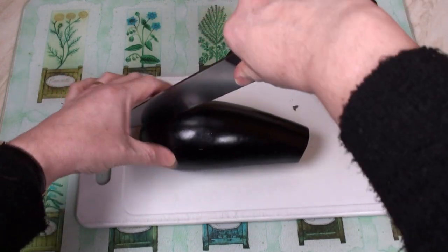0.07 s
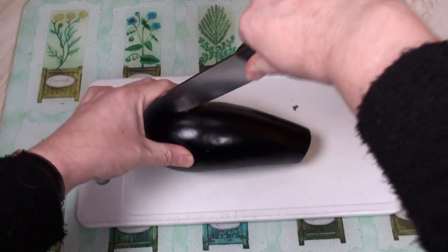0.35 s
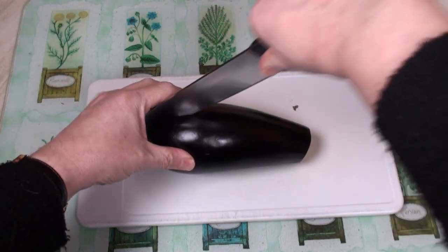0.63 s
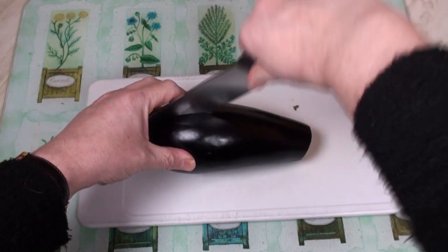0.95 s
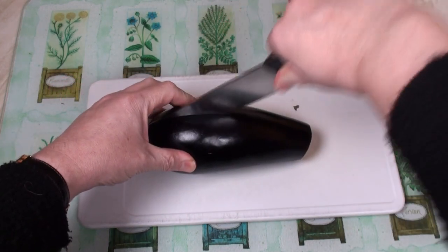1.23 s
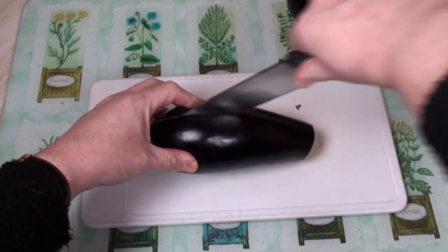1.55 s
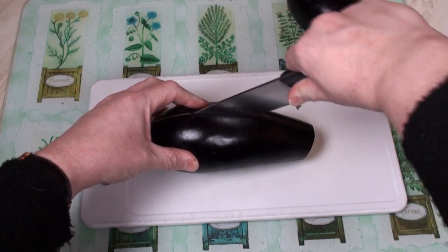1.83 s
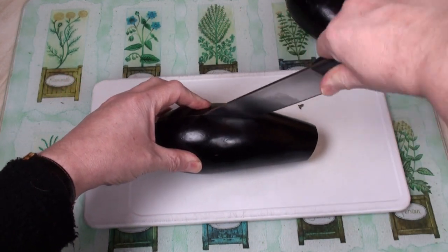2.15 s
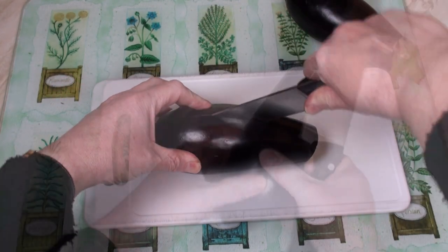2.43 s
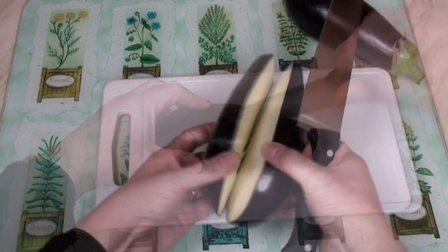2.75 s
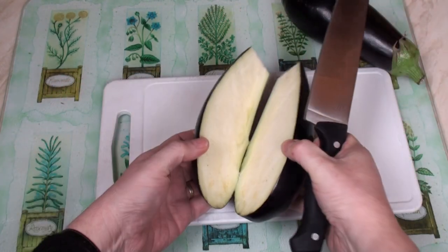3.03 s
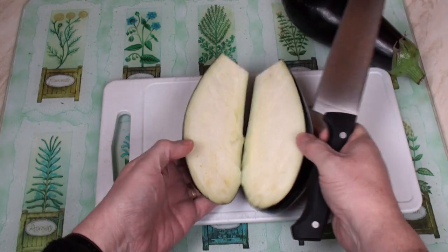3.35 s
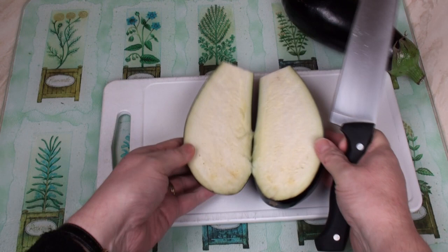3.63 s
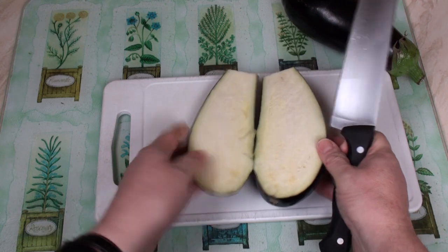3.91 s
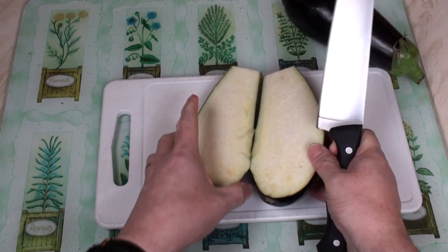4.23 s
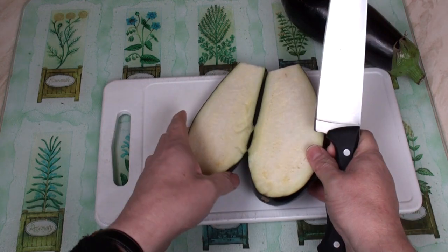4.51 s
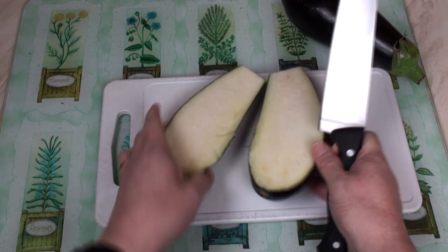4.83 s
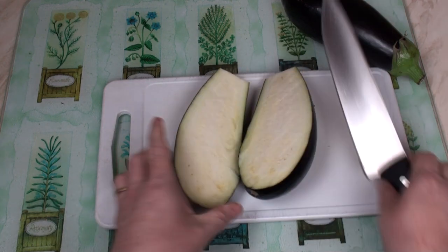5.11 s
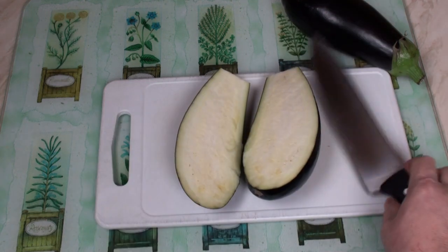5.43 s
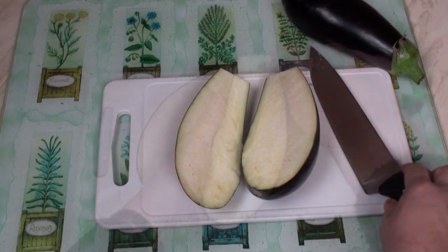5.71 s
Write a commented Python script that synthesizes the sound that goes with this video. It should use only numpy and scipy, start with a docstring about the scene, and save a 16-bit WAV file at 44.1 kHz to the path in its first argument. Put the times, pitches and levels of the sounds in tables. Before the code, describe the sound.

A kitchen knife cuts a raw aubergine with a few quiet, rasping strokes, close to the microphone, after a brief small rattle. The blade hits the plastic board with two loud, hollow knocks. Light rubs, moist taps and dull bumps follow as the halves are parted and set down, then the knife lands with a short ringing chatter. A faint hum and rumble fill the small, slightly echoing kitchen.

```python
"""In a small, live kitchen, hands shift an aubergine on a plastic chopping board and a small part rattles.
A chef's knife saws through it in six strokes, bursting cells and tearing skin; twice along the way
the edge strikes the board, and a hollow ring lingers. The halves are pulled apart and set down with
soft, damped bumps. Last, the knife is laid on the board and its steel rings and chatters.
Rumble and hum lie under it all, and the sound is nearly mono."""
import sys
import numpy as np
from scipy import signal
from scipy.fft import rfft, irfft, next_fast_len
from scipy.io import wavfile

SR = 44100
rng = np.random.default_rng(int(sys.argv[2]) if len(sys.argv) > 2 else 0)


def pcm_store(signal):
    """Save signal as 16-bit PCM."""
    levels = np.round(np.clip(np.atleast_2d(signal), -1, 1) * 32767)
    wavfile.write(sys.argv[1], SR, levels.astype(np.int16).T)


N = 258687
T = np.arange(N) / SR

# strokes of the blade: start_s, rise_s, hold_s, fall_s, level_db, skin_db
BLADE_STROKES = [(.695, .085, 0.11, 0.029, -43, -12), (1.261, 0.073, 0.04, 0.021, -36.5, -12.5),
                 (1.768, 0.096, 0.015, 0.019, -34.5, -12.5), (1.97, 0.043, .02, 0.026, -46.5, -9),
                 (2.279, 0.084, 0.011, .012, -38.5, -10), (2.827, 0.048, 0.015, 0.047, -43.5, -12)]
# spectrum of cells bursting, heard through flesh and board: frequency_hz, level_db
FLESH_SPECTRUM = [(71, -21), (120, -9), (243, -9.5), (413, 0), (648, -7.5), (788, 0.5), (1100, -3.5),
                  (1240, -5), (1360, -6.5), (3110, -23.5), (3560, -24.5), (3860, -26), (5820, -26.5),
                  (7080, -34), (13000, -39)]
def slicing():
    """Fracture noise grows as a power of blade speed: flesh yields at once, skin only tears at speed."""
    blade_hz, blade_width_hz = 3530, 130
    flesh_power, skin_power = 0.56, 2.03
    tearing = colour(crackle(per_s=7000, spread_db=2), FLESH_SPECTRUM)
    flesh = unit(cut(tearing, 2240, "low", order=4))
    blade_resonance = signal.iirpeak(blade_hz, blade_hz / blade_width_hz, fs=SR)
    blade = signal.lfilter(*blade_resonance, tearing)
    rasp = cut(tearing + undb(4) * blade, 2620, "high", order=4)
    skin = unit(cut(rasp, 11000, "low"))
    out = np.zeros(N)
    for start_s, rise_s, hold_s, fall_s, level_db, skin_db in BLADE_STROKES:
        speed = swell(start_s, rise_s, hold_s, fall_s)
        yielding = undb(-2.5) * flesh * speed ** flesh_power
        ripping = undb(skin_db) * skin * speed ** skin_power
        out += undb(level_db) * (yielding + ripping)
    return out


# the edge meets the board, tip then heel: start_s, level_db, contact_hz, crunch_db, worktop_db
EDGE_IMPACTS = [(1.8720, -8, 1850, -15, 4), (1.8741, -13.5, 2400, -8, -19), (1.8793, -23, 1655, -30, -14),
                (2.3666, -8.5, 1370, -11.5, 1.5)]
# modes of the plastic board: pitch_hz, level_db, t60_s
BOARD_MODES = [(391, -23, 0.12), (468.3, -24.5, 0.62), (591, -15.5, 0.4), (603, -0.5, 0.015),
               (724.5, -11.5, 0.15), (765, -6.5, 0.051), (959, -0.5, 0.026), (1440, -17.5, 0.07),
               (1990, -5, 0.009)]
# modes of the worktop under it: pitch_hz, level_db, t60_s
WORKTOP_MODES = [(28.4, -29, 0.16), (46.4, -24.5, .14), (104, -31, 0.28), (175, -27.5, 0.17),
                 (232, -21.5, 0.058), (374, -28.5, 0.11)]
def chops():
    """Impact excitation: the edge crunches through the last skin and rings both board and worktop."""
    out = np.zeros(N)
    for start_s, level_db, contact_hz, crunch_db, worktop_db in EDGE_IMPACTS:
        board = ring(BOARD_MODES) * fade(t60_s=0.3)  # the pressing edge adds damping
        knock = cut(board, contact_hz, "low") + undb(worktop_db) * ring(WORKTOP_MODES)
        crunch = cut(crack(crunch_db, t60_s=0.1), 2500, "low", order=1)
        crunch = cut(cut(crunch, 1400, "high"), 3270, "low")
        add(out, start_s, undb(level_db) * (knock + crunch))
    return out


def linger():
    """Exponential decay of band-limited noise: a soft hollow ring outlasts the last chop."""
    band_hz, level_db, t60_s = [555, 1005], -45, 1.37
    band = signal.butter(2, band_hz, "band", fs=SR, output="sos")
    hollow = unit(signal.sosfilt(band, rng.standard_normal(N)))
    out = np.zeros(N)
    add(out, EDGE_IMPACTS[-1][0], undb(level_db) * hollow * fade(t60_s, T))
    return out


# the knife lands, handle then blade, and settles: start_s, level_db, contact_hz, board_db
KNIFE_LANDINGS = [(5.7278, -10.5, 3560, -10), (5.7632, -13, 10900, -9), (5.807, -21.5, 3000, -7.5),
                  (5.852, -27, 5800, -13)]
# modes of the steel knife: pitch_hz, level_db, t60_s
STEEL_MODES = [(442, -16, .26), (555, -19, .16), (743, -4, .2), (1063, -15, .08), (1366, -9, .07),
               (1760, -12, .06), (2488, -7, .16), (2570, -7, .06), (2679, -12, .14), (2864, -13, .13),
               (3130, -14, .06), (3351, -10, .11), (3412, -10, .12), (3550, -11, .07), (3710, -7, .11),
               (4945, -18, .13), (5640, -15, .06), (6190, -16, .14), (6392, -18, .12), (6850, -14, .09),
               (7110, -18, .11), (7598, -14, .13), (8315, -17, .1), (8858, -17, .11), (10060, -19, .06),
               (11290, -11, .09)]
def knife_down():
    """Inelastic bouncing: each landing rings steel and board, and clacks follow at shrinking gaps."""
    first_gap_s, gap_ratio, bounce_loss_db = 0.0055, 0.8, 0.5
    steel = undb(-10) * ring(STEEL_MODES) * fade(t60_s=0.79)  # the hand adds damping
    out = np.zeros(N)
    for start_s, level_db, contact_hz, board_db in KNIFE_LANDINGS:
        blow = np.zeros(N)
        add(blow, 0, steel + undb(board_db) * ring(BOARD_MODES))
        delay_s = 0
        for k in range(3):
            clack = cut(crack(-4.5, t60_s=0.05), 3830, "low", order=6)
            sizzle = cut(crack(-14, t60_s=0.1), 7700, "low")
            add(blow, delay_s, undb(-bounce_loss_db * k) * cut(clack + sizzle, 450, "high"))
            delay_s += first_gap_s * gap_ratio ** k
        add(out, start_s, undb(level_db) * cut(blow[:SR // 2], contact_hz, "low", order=1))
    # the weight of the handle arrives with the first contact
    add(out, KNIFE_LANDINGS[0][0], undb(-7.5) * ring(WORKTOP_MODES))
    return out


# the vegetable rocks or drops on the board: start_s, level_db, contact_hz, thud_hz
VEGETABLE_BUMPS = [(.080, -48, 400, 374), (.157, -32.5, 696, 227), (0.1931, -34.5, 750, 253),
                   (1.2621, -37, 804, 376), (1.271, -33.5, 504, 360), (1.775, -29, 500, 452),
                   (2.292, -42.5, 1080, 380), (3.988, -41.5, 2080, 106), (4.0328, -35, 2540, 104),
                   (4.5636, -32, 1210, 420), (4.698, -32, 1000, 400), (4.717, -31, 1400, 450),
                   (5.352, -44, 600, 383)]
# light wet taps of fingers and cut faces: start_s, level_db
WET_TAPS = [(3.168, -51), (3.252, -45), (3.524, -42), (4.171, -47.5), (4.38, -43), (4.4116, -45),
            (4.424, -47), (4.5, -51), (5.373, -50.5)]
def bumps():
    """Compliant contact softens the treble; the vegetable's mass adds a thud that light taps lack."""
    thud_db, thud_cycles, tap_contact_hz = 2.5, 13, 1490
    out = np.zeros(N)
    for start_s, level_db, contact_hz, thud_hz in VEGETABLE_BUMPS:
        thud = ring([(thud_hz, thud_db, thud_cycles / thud_hz)])
        blow = soft_blow(skid_db=-9) + thud
        add(out, start_s, undb(level_db) * cut(blow, contact_hz, "low", order=1))
    for start_s, level_db in WET_TAPS:
        tap = cut(soft_blow(skid_db=-3), tap_contact_hz, "low", order=1)
        add(out, start_s, undb(level_db) * tap)
    return out


# modes of the board under the vegetable: pitch_hz, level_db, t60_s
DAMPED_BOARD_MODES = [(165, -21.5, 0.12), (534, -7, 0.034), (600, -19, 0.084), (746, -1, 0.051),
                      (1040, 8.5, 0.0056), (1400, 5, 0.0046), (2240, -5.5, 0.013)]
def soft_blow(skid_db):
    """Contact damping: soft flesh slaps the board, deadens its modes and skids a little."""
    slap = cut(crack(-1, t60_s=0.015), 3300, "low")
    skid = cut(crack(16, t60_s=0.082), 1370, "low", order=4)
    return ring(DAMPED_BOARD_MODES) + cut(slap, 1100, "high") + undb(skid_db) * cut(skid, 640, "high")


# hands, blade and halves slide lightly: start_s, length_s, level_db
LIGHT_RUBS = [(0, 0.025, -42.5), (1.018, 0.043, -51.5), (1.48, 0.076, -47.5), (1.596, 0.09, -54),
              (3.26, 0.046, -51), (3.52, 0.17, -54), (3.96, 0.14, -48.5), (4.842, 0.076, -52),
              (5.012, 0.063, -47)]
# spectrum of rubbed peel: frequency_hz, level_db
PEEL_SPECTRUM = [(150, -38), (400, -10.5), (700, -2), (1100, 3.5), (1500, -4), (2200, -7), (3000, -15),
                 (5000, -22.5), (9000, -37)]
# the grip, firm while cutting and looser afterwards: time_s, level_db
GRIP_LEVELS = [(0, -49.5), (1.3, -55.5), (2.55, -53), (3.1, -57), (3.802, -67), (4.85, -53), (5.2, -61.5)]
# spectrum of the shifting palm: frequency_hz, level_db
PALM_SPECTRUM = [(100, -2), (280, 4), (500, -4.5), (1000, -1), (2000, -10), (4000, -19), (9000, -33)]
def handling():
    """Stick-slip friction: fine grains swell with each rub, over the duller shifting of the grip."""
    rise_share = 0.36
    grains = colour(crackle(per_s=3500, spread_db=3), PEEL_SPECTRUM)
    rubs = np.zeros(N)
    for start_s, length_s, level_db in LIGHT_RUBS:
        rubs += undb(level_db) * swell(start_s, rise_share * length_s, 0, (1 - rise_share) * length_s)
    firmness = undb(np.interp(T, *np.transpose(GRIP_LEVELS)))
    grip = colour(crackle(per_s=2200, spread_db=3), PALM_SPECTRUM) * firmness
    return undb(-0.5) * grains * rubs + undb(-4.5) * grip


# modes of a small loose part: pitch_hz, level_db, t60_s
LOOSE_PART_MODES = [(2800, 2, 0.024), (3120, 0.5, 0.0086)]
# modes of its mount, which takes the first jolt: pitch_hz, level_db, t60_s
MOUNT_MODES = [(41.7, -12.5, 0.19), (112, -8.5, 0.029), (1255, -9, 0.044), (1610, -5.5, 0.021)]
def rattle():
    """Repeated impact: a loose part very close by ticks back and forth, losing energy each time."""
    start_s, period_s, attack_s = 0.5677, 0.0187, 0.001
    first_db, tick_loss_db = -21.5, 6
    attack = 1 - np.exp(-(T[:SR // 2] / attack_s) ** 2)
    tick = attack * ring(LOOSE_PART_MODES)
    out = np.zeros(N)
    for k in range(5):
        add(out, start_s + k * period_s, undb(first_db - k * tick_loss_db) * tick)
    jolt = ring(MOUNT_MODES) + cut(crack(-5, t60_s=0.064), 2700, "low")
    add(out, start_s, undb(-22) * attack * jolt)
    return out


# reflections from worktop and near wall: delay_s, gain
EARLY_ECHOES = [(.0021, 0.15), (.0046, 0.14), (.0073, 0.23), (.0094, 0.069)]
# standing waves between worktop and walls: pitch_hz, level_db, t60_s
STANDING_WAVES = [(95.7, -61, 0.21), (168.8, -47.5, 0.2), (223, -68, 0.43), (299.7, -54, 0.16)]
# spectrum of the diffuse tail: frequency_hz, level_db
TAIL_SPECTRUM = [(60, 9), (250, 5.5), (500, 5), (950, -3), (2000, 0.5), (8000, 0)]
# reverberation time by band: frequency_hz, t60_s
TAIL_DECAY = [(100, 0.27), (300, 0.31), (800, 0.4), (2000, 0.43), (5000, 0.37), (12000, 0.27)]
def kitchen(x, wet_db):
    """Reverberation: x is convolved with direct sound, echoes, standing waves and a diffuse tail."""
    t = T[:SR * 3 // 4]
    hz = np.fft.rfftfreq(len(t), 1 / SR)
    spectrum = rfft(rng.standard_normal(len(t))) * undb(on_log(TAIL_SPECTRUM, hz))
    tail = 0
    for band_hz, t60_s in TAIL_DECAY:
        share = on_log([(f, f == band_hz) for f, _ in TAIL_DECAY], hz)  # neighbouring bands crossfade
        tail += irfft(spectrum * share, len(t)) * fade(t60_s, t)
    tail *= np.clip((t - 0.004) / 0.016, 0, 1)  # builds up from 4 to 20 ms
    response = undb(wet_db) * tail / np.sqrt(np.sum(tail ** 2))
    response[0] = 1
    for delay_s, gain in EARLY_ECHOES:
        response[int(delay_s * SR)] += gain
    add(response, 0, ring(STANDING_WAVES))
    return signal.fftconvolve(x, response)[:N]


# spectrum of the room's rumble: frequency_hz, level_db
RUMBLE_SPECTRUM = [(12, -30), (20, -6.5), (64, -3.5), (213, -10), (266, -11.5), (427, -12), (667, -17),
                   (857, -17), (3260, -25), (15500, -25.5)]
# low tones of the kitchen: pitch_hz, level_db
HUM_TONES = [(49, -61.5), (101, -65)]
# spectrum of each microphone channel's own noise: frequency_hz, level_db
CHANNEL_NOISE_SPECTRUM = [(12, -21), (20, 4), (259, -23), (631, -27.5), (1820, -47), (2150, -39),
                          (4810, -26), (15500, -23.5)]
def background():
    """Noise floor: rumble and phase-modulated hum in both channels, plus faint uncorrelated noise."""
    rumble = undb(-56) * colour(rng.standard_normal(N), RUMBLE_SPECTRUM)
    hum = np.zeros(N)
    for pitch_hz, level_db in HUM_TONES:
        waver_rad = 0.79 * unit(cut(rng.standard_normal(N), 5.1, "low"))
        hum += undb(level_db) * unit(np.sin(2 * np.pi * pitch_hz * T + waver_rad))
    channel_noise = np.array([colour(rng.standard_normal(N), CHANNEL_NOISE_SPECTRUM) for _ in range(2)])
    return rumble + hum + undb(-67.5) * channel_noise


def ring(modes):
    """Modal superposition: damped sines after one blow, neighbours swinging in opposite directions."""
    t = T[:SR // 2]
    return sum((-1) ** k * undb(level_db) * np.sin(2 * np.pi * pitch_hz * t) * fade(t60_s)
               for k, (pitch_hz, level_db, t60_s) in enumerate(modes))


def crack(level_db, t60_s):
    """Modal overlap: the many short-lived modes of a blow merge into a noise burst."""
    return undb(level_db) * rng.standard_normal(SR // 2) * fade(t60_s)


def crackle(per_s, spread_db):
    """Poisson process: tiny random ruptures, mostly small and a few large."""
    ruptures = rng.random(N) < per_s / SR
    return ruptures * rng.standard_normal(N) * undb(spread_db * rng.standard_normal(N))


def swell(start_s, rise_s, hold_s, fall_s):
    """Speed of a hand movement, 0 to 1: it accelerates, holds and comes to rest."""
    corners_s = np.cumsum([0, rise_s, hold_s, fall_s])
    return np.sin(np.pi / 2 * np.interp(T - start_s, corners_s, [0, 1, 1, 0]))


def fade(t60_s, t=T[:SR // 2]):
    """Exponential decay by 60 dB in t60_s."""
    return np.exp(-np.log(1000) * t / t60_s)


def colour(x, spectrum):
    """Spectral shaping of x, at rms 1."""
    size = next_fast_len(len(x))
    hz = np.arange(size // 2 + 1) * SR / size
    shaped = rfft(x, size) * undb(on_log(spectrum, hz))
    return unit(irfft(shaped, size)[:len(x)])


def cut(x, hz, kind, order=2):
    """Low-pass or high-pass filter."""
    return signal.sosfilt(signal.butter(order, hz, kind, fs=SR, output="sos"), x)


def on_log(points, hz):
    """Interpolate (frequency_hz, value) points on a log-frequency axis."""
    f, value = np.transpose(points)
    return np.interp(np.log(np.maximum(hz, 1)), np.log(f), value)


def undb(db):
    """Decibels to gain."""
    return 10 ** (np.asarray(db) / 20)


def unit(x):
    """Scale to rms 1."""
    return x / np.sqrt(np.mean(x ** 2))


def add(out, start_s, x):
    """Mix x into out from start_s."""
    i = int(start_s * SR)
    out[i:i + len(x)] += x[:N - i]


def scene():
    """Superposition: each kind of contact has its share of room; the rattle is too near to wake it."""
    hard = kitchen(chops(), wet_db=-7.5) + kitchen(knife_down(), wet_db=-7.5)
    sliding = kitchen(slicing() + handling(), wet_db=-5)
    soft = kitchen(bumps(), wet_db=-10.5)
    return hard + sliding + soft + linger() + rattle() + background()


def record(dry):
    """Band limiting: a steep elliptic low-pass removes the highest treble."""
    top_hz = 15800
    return signal.sosfilt(signal.ellip(10, 0.1, 80, top_hz, fs=SR, output="sos"), dry)


dry = scene()
out = record(dry)
pcm_store(out)
```